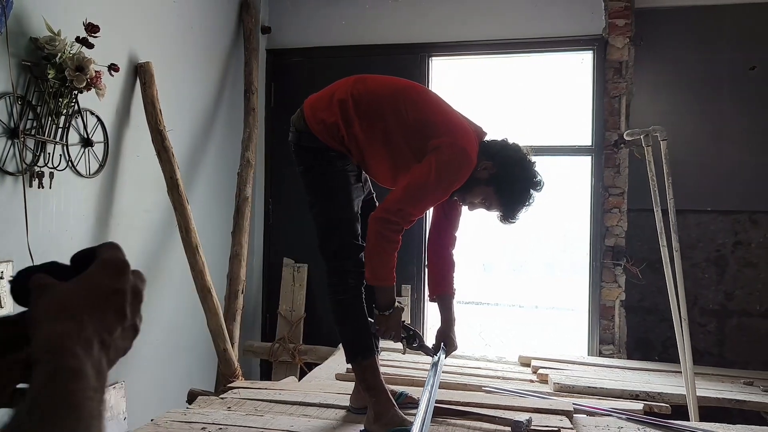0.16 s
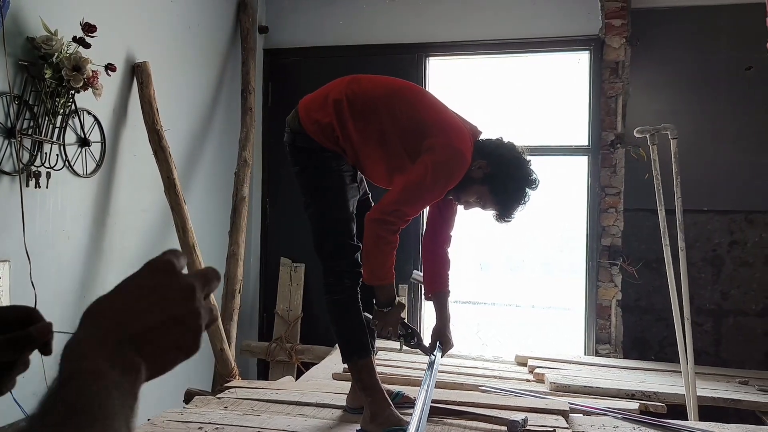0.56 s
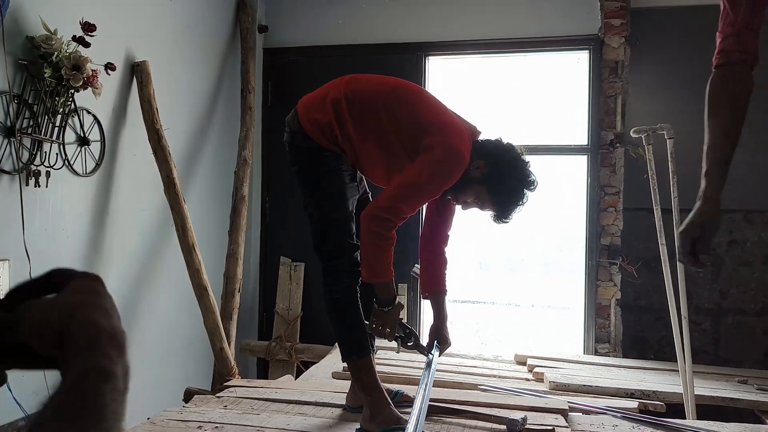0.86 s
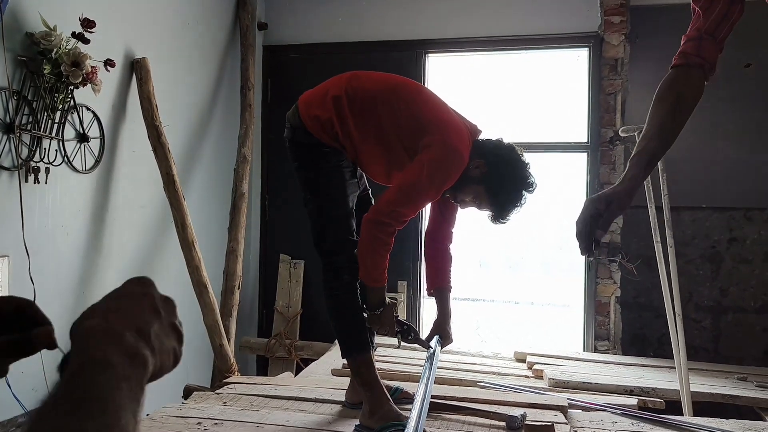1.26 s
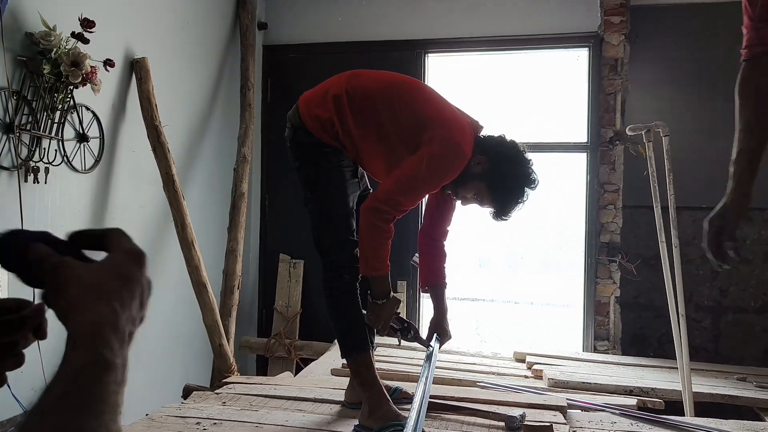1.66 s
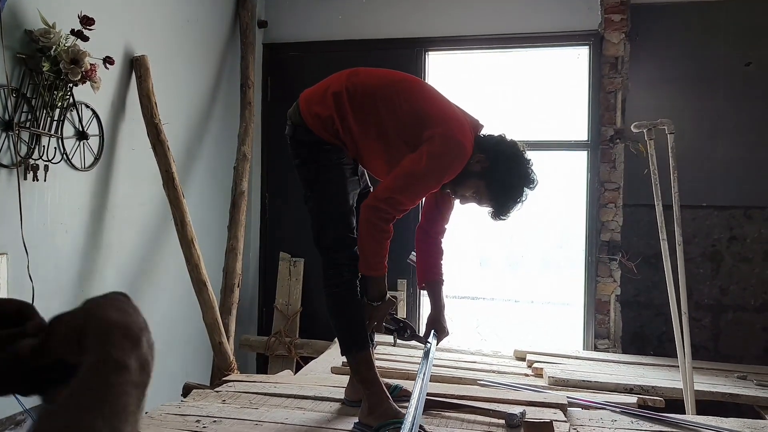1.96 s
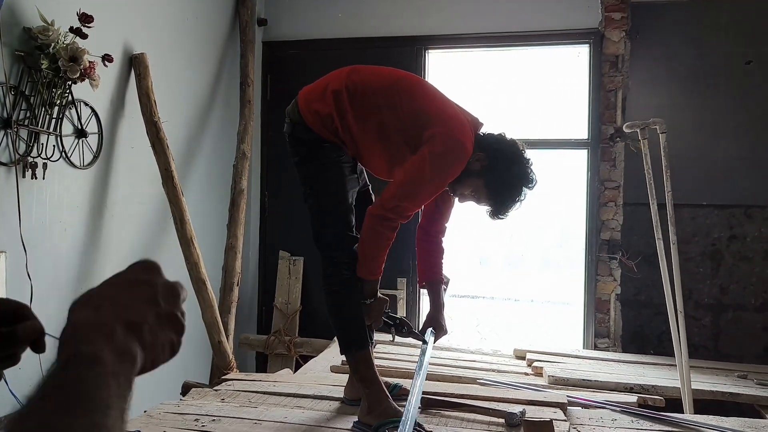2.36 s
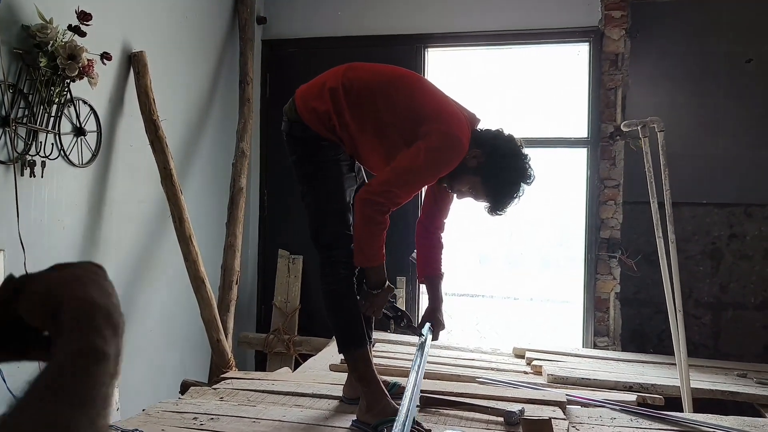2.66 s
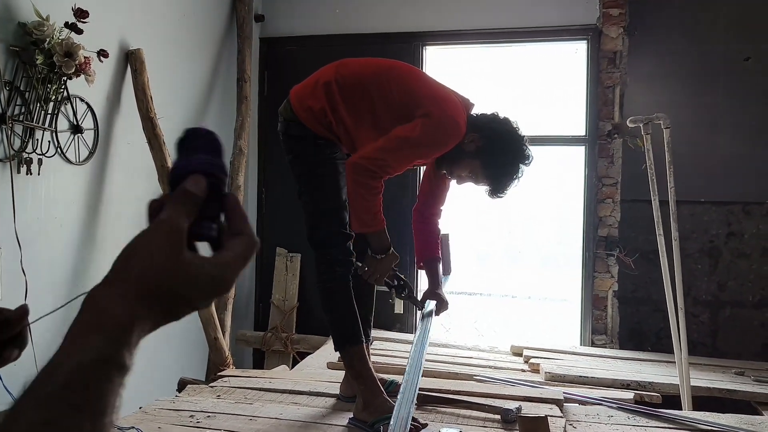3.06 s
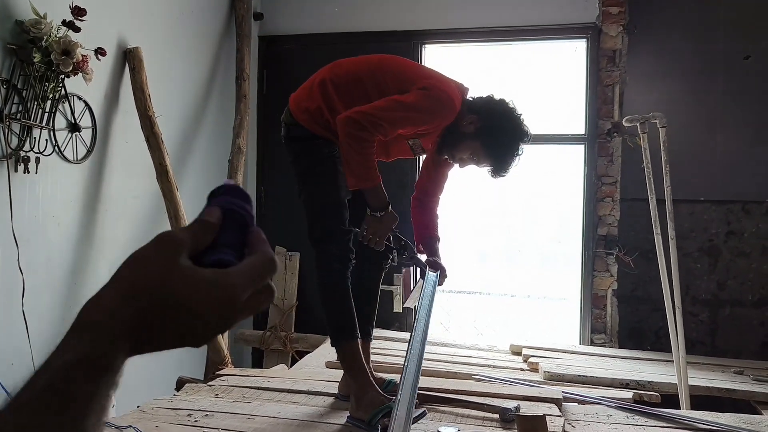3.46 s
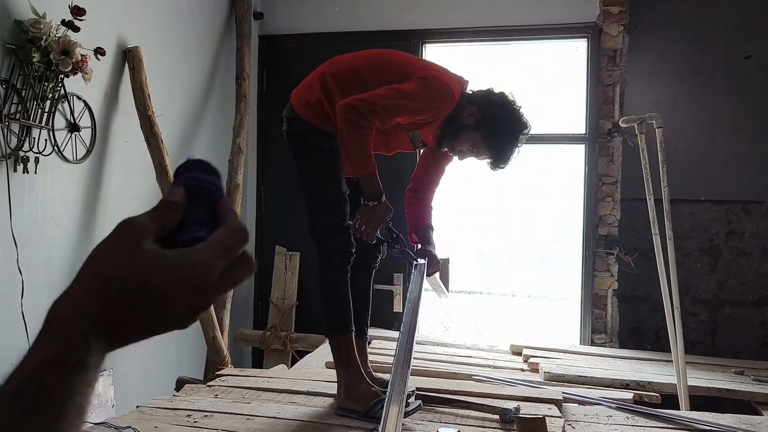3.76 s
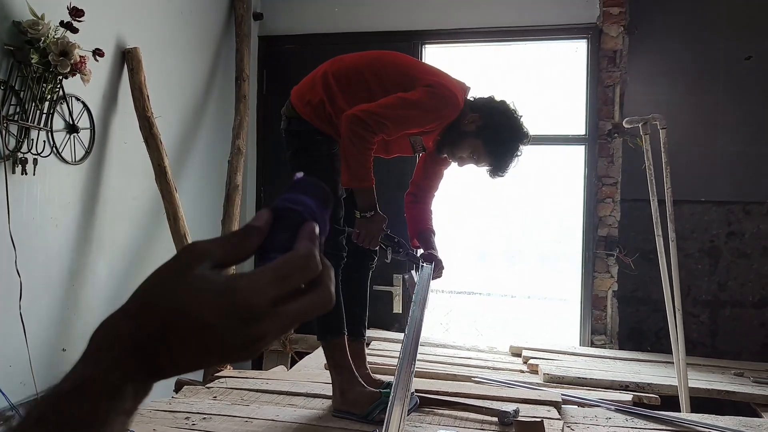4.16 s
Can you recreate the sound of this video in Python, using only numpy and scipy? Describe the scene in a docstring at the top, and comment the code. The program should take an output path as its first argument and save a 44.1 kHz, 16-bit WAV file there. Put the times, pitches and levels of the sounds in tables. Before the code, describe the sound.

A bare room with hard walls, heard through a phone a few metres from the work. Faint room and street noise hums underneath. For the first 1.6 seconds there is little: a tiny metal tick near the start, a light click at 0.7, fainter ones at 1.05 and 1.4. At about 1.6 the snips cut the thin steel channel: four hard, bright snaps crowd into a tenth of a second, with dense gritty shearing and a thin, tinny ring, then a smaller snap at 1.95. Near silence follows, with a slight plank knock at 2.25. At 2.45 a hollower metallic clack rings, a strong dull wooden knock lands at 2.57, and steel scrapes until about 3.0. Further clacks come near 3.05 and 3.35, a rattling scrape with plank rumble around 3.75, then it dwindles, with a faint knock at 4.1. Soft deep finger thumps touch the phone throughout.

```python
"""A bare room with a pile of planks: hand snips work on a thin steel channel a few metres from a phone.
Blows and dense shearing clicks drive modes and noise bursts of the channel's web, flanges, cut edge and burr.
The planks rumble as resonant noise and knock as soft decaying tones; fingers thump the phone in deep noise.
Coloured noise hums faintly, with one brief low tone. Steel and planks get the room's echo tail."""
import sys
import numpy as np
from scipy import signal
from scipy.fft import rfft, irfft
from scipy.io import wavfile

SR = 44100
rng = np.random.default_rng(int(sys.argv[2]) if len(sys.argv) > 2 else 0)


def waveform_to_disk(signal):
    """Save audio, clipped to [-1, 1], as 16-bit WAV at the path in sys.argv[1]."""
    frames = np.transpose(np.atleast_2d(signal))
    scaled = np.clip(frames, -1, 1) * 32767
    samples = np.round(scaled).astype(np.int16)
    wavfile.write(sys.argv[1], SR, samples)


def volts(x):
    """Linear amplitude factor 10**(x/20) for a level x in dB, scalar or array-like."""
    e = np.asarray(x, float) / 20
    return 10 ** e


N = 189364
T = np.arange(N) / SR

# noise of room and street, as a colour: (f/Hz, relative level/dB per Hz)
HUM_COLOUR = [(24, -44), (40, 20.5), (204, 9), (529, -40), (1090, 3), (1630, -14.5), (2840, -8.5),
              (7730, -14.5), (9690, -48.5), (12800, -18.5), (16000, -48.5)]
HUM_DB = -62
# faint low tone that swells and fades: (start t/s, end t/s, f/Hz, peak level/dB)
LOW_TONE = (.8, 1.08, 212, -58)

# fingers on the phone: (t/s, hold/s, level/dB)
FINGER_THUMPS = [(0.05, 0.13, -66), (1.42, 0.022, -64), (1.61, 0.036, -47), (1.7, .02, -46.5),
                 (2.1, 0.3, -68.5), (2.45, 0.052, -50.5), (2.62, 0.22, -58), (3.04, .03, -53.5),
                 (3.48, 0.089, -51.5), (3.72, 0.3, -53.5), (4.2, .06, -54)]
HAND_REST_DB = -75.5
PRESS_DB_PER_S, EASE_DB_PER_S = 253, 151.5  # how fast weight and fingers press and ease off

# resonances of long, middle and short planks: (f/Hz, width of each filter pass/Hz)
PLANK_RESONANCES = [(128, 55), (212, 60), (355, 150)]
# weight shifting on the pile: (t/s, hold/s, long planks level/dB, middle level/dB, short level/dB)
WEIGHT_SHIFTS = [(0.0, 0.11, -61.5, -66, -63), (1.412, 0.037, -59, -59, -53.5),
                 (1.672, 0.032, -63, -76, -54), (2.118, .04, -63, -58.5, -60.5),
                 (2.514, .04, -71, -61, -43.5), (2.594, 0.038, -45, -51, -41.5),
                 (2.682, .04, -43.5, -51, -47), (2.885, 0.087, -57, -65, -63.5),
                 (3.048, 0.056, -74, -66, -55), (3.363, 0.098, -59.5, -60.5, -49.5),
                 (3.506, 0.047, -64, -60, -50), (3.742, 0.11, -54, -44, -42),
                 (4.129, 0.097, -56.5, -58.5, -54)]
# rumble of the pile at rest: (long planks level/dB, middle level/dB, short level/dB)
PILE_REST = [-68, -69, -67.5]
# knocks on the planks: (t/s, level/dB, f/Hz, t60/s)
PLANK_KNOCKS = [(2.264, -29.5, 319, 0.023), (2.57, -12, 321, 0.025), (4.118, -36.5, 306, 0.058)]

# sharp blows on the steel: (t/s, flange level/dB, web level/dB re flange, edge level/dB re flange, contact/ms)
STEEL_BLOWS = [(0.0646, -34, -4.5, -10.5, 6.3), (0.711, -30.5, -2.5, -4.5, 1.4),
               (1.0614, -43.5, -13, -14, 6.2), (1.3812, -34, 6.5, -22.5, 6.8),
               (1.6135, -11, -27, 6.5, 1.57), (1.6705, -3.5, -37, -1, 1.4), (1.696, -8.5, -21.5, 4, 2.1),
               (1.7136, -3.5, -36, -11.5, 10), (1.9363, -14, -22, -3, 1.46), (2.4431, -9.5, -4, 3.5, 3.27),
               (2.946, -36.5, -1, -10, 5.1), (3.037, -22.5, -19, -19, 1.7), (3.3577, -15.5, -33, -12, 2.34)]
# blades shearing, steel sliding: (full bite t/s, hold/s, flange level/dB, web and edge level/dB re flange)
SHEAR_STROKES = [(0.0, 0.0042, -51, 2, -9), (.07, 0.0091, -47, -2.5, -1.5), (0.326, 0.04, -61, -2, -1.5),
                 (0.431, 0.027, -63.5, 2.5, -7), (0.679, .022, -58.5, -1.5, -8),
                 (0.711, 0.006, -42, -3, -4), (0.916, 0.042, -74, 0, -1), (1.069, 0.0092, -57, -1, -14),
                 (1.142, 0.027, -62.5, -0.5, -10), (1.351, .018, -55, -1, -13),
                 (1.383, 0.03, -40.5, 11, -25), (1.568, 0.036, -56.5, 6.5, 2),
                 (1.615, 0.0043, -26.5, -9.5, 8), (1.665, 0.073, -20, -15, -4.5),
                 (1.801, 0.044, -29.5, -16, -1), (1.906, .03, -39.5, -23, 5),
                 (1.929, 0.049, -30.5, -18, -5), (2.195, 0.048, -68.5, -0.5, 2),
                 (2.285, .08, -64.5, 2.5, 0), (2.445, .012, -24, -4.5, 0.5), (2.496, 0.1, -38.5, 5, -5.5),
                 (2.67, 0.17, -33.5, -3.5, -4.5), (2.809, 0.028, -36, -3.5, -4.5),
                 (2.937, 0.05, -38.5, 0.5, -8), (3.019, 0.053, -43.5, -1.5, -3),
                 (3.107, 0.023, -56.5, 12.5, -21), (3.205, .06, -55, 4.5, 1.5), (3.283, 0.071, -43, -1, -4),
                 (3.363, 0.029, -34, 2.5, -7), (3.389, 0.024, -38, -0.5, -20),
                 (3.531, 0.093, -67, 2.5, -13), (3.714, .012, -44.5, 3, -5),
                 (3.734, 0.077, -30, -1.5, -7.5), (3.841, .11, -41, 0.5, -4),
                 (3.984, 0.048, -63.5, 10, -10.5), (4.136, 0.084, -59.5, 6, 2)]
# modes that stand out, a list for main ring, web, flanges, edge, burr: (f/Hz, relative level/dB, t60/s)
STEEL_MODES = [
    [(947, -7, .3), (1040, -7, .2), (1066, 0, .35), (1090, -1, .3), (1120, -4, .25), (1150, -6, .2)],
    [(700, -4, .3), (770, -4, .25), (1235, -2, .25), (1345, -1, .25), (1700, -3, .4), (2170, -6, .3)],
    [(2580, -4, .25), (2665, 0, .25), (2745, -3, .25), (2920, -1, .25), (3150, -2, .25), (3330, -3, .25),
     (3470, -3, .2)],
    [(4570, 0, .2), (5050, -2, .2), (5410, -4, .2), (7850, -3, .15)],
    [],
]
# crowd of small plate modes in main ring and web, as a colour: (f/Hz, relative level/dB per Hz)
WEB_COLOUR = [(240, -46), (420, -11.5), (620, -7), (800, -4), (1000, -4), (1400, -4.5), (1900, -8.5),
              (2400, -10), (3100, -21)]
# the same for the flanges: (f/Hz, relative level/dB per Hz)
FLANGE_COLOUR = [(1240, -58.5), (2100, -25), (2430, -9.5), (2600, 1), (3010, 1.5), (3460, -1.5),
                 (3990, -17.5), (4600, -27), (5980, 1), (10100, -120)]
# the same for the cut edge: (f/Hz, relative level/dB per Hz)
EDGE_COLOUR = [(2530, 10), (4300, 2), (4610, 2), (5900, -3), (7950, -0.5), (9600, -16), (12500, -61),
               (21100, -120)]
# the same for the burr: (f/Hz, relative level/dB per Hz)
BURR_COLOUR = [(5530, -30.5), (9400, -17.5), (9840, -6), (10700, 1), (14900, 3), (16200, -1.5)]
# per part: (lowest f/Hz, highest f/Hz, crowd t60/s, crowd level/dB re single modes, left re right level/dB)
STEEL_PARTS = [(930, 1400, .15, -9.5, 4), (405, 2360, 0.062, 8.5, 2), (2430, 4400, 0.17, 11, -1),
               (4340, 9500, 0.27, 17, 2), (9280, 17000, 0.15, 30, -0.5)]
# how fast a stroke dies: main ring, web, flanges, edge, burr (each fall/dB per s)
LET_GO = [170, 190, 230, 243.6, 300]
# faint rubbing that never stops: main ring, web, flanges, edge, burr (each level/dB)
CREEP = [-71.5, -66, -71.5, -79.5, -91.5]
# the jaws hold the web: (from t/s, to t/s); its start is also the first cut
CLAMPED = (1.6, 2.15)
CHOKE_DB = -26.5  # main ring while clamped
UNCUT_DB = -5.5  # burr before the first cut
MAIN_DB, STROKE_BURR_DB, BLOW_BURR_DB = 2, -6, -6  # main ring re web; burr re edge
BITE_DB_PER_S, SAG_DB_PER_S = 2202, 28.5  # a stroke bites, then sags while it holds
CLICKS_PER_S, CLICK_SPREAD_DB = 6000, 1.5
CHATTER_PER_S, CHATTER_DB = 50, 1.8  # uneven bursts of clicks
REDRAW_SAMPLES = 4096  # the ring responses are redrawn at random this often
MODE_SPREAD_DB = 2  # random spread of the single modes' levels
CRACK_T60_S, CRACK_DB = 0.038, -2  # level re the crowd
PORT_LAG_S = 0.00027

ROOM_T60_S, ROOM_DB = 0.22, -5.5
TOP_HZ = 15800


def unit(x):
    """Scale to rms 1."""
    return x / np.sqrt(np.mean(x ** 2))


def colour(x, points):
    """Shape the spectrum along (f/Hz, level/dB) points, straight lines over log frequency."""
    hz, db = np.transpose(points)
    f = np.maximum(np.fft.rfftfreq(x.shape[-1], 1 / SR), 1)
    curve_db = np.interp(np.log(f), np.log(np.maximum(hz, 1)), db)
    return irfft(rfft(x) * volts(curve_db), x.shape[-1])


def fade(t60, size):
    """Exponential fall of 60 dB in t60 seconds."""
    return np.exp(-np.log(1000) * np.arange(size) / SR / t60)


def sides(db):
    """Left and right gains for a level difference."""
    return volts(np.array([db, -db]) / 2)


def swell(at, hold, db, rise, sag, fall):
    """Power of an event that rises to its level, sags while it holds and falls away; slopes in dB per s."""
    t = T - at
    before, during, after = np.maximum(-t, 0), np.clip(t, 0, hold), np.maximum(t - hold, 0)
    return volts(2 * (db - rise * before - sag * during - fall * after))


def pressing(rows, rest_db):
    """Gain over time of a resting level and the presses on top of it, one line per level column."""
    power = volts(2 * np.reshape(rest_db, (-1, 1)))
    for at, hold, *db in rows:
        power = power + swell(at, hold, np.reshape(db, (-1, 1)), PRESS_DB_PER_S, 0, EASE_DB_PER_S)
    return np.sqrt(power)


def hum():
    """Faint steady noise of room and street, and one brief low tone."""
    noise = rng.standard_normal(N) + 1.9 * rng.standard_normal((2, N))  # shared + own to each side
    steady = unit(colour(noise, HUM_COLOUR)) * volts(HUM_DB)
    start, end, hz, db = LOW_TONE
    arch = np.sin(np.pi * np.clip((T - start) / (end - start), 0, 1))
    return steady + volts(db) * arch * np.sin(2 * np.pi * hz * T)


def hand():
    """Fingers thump the phone's case: deep noise that swells with each press, stronger at the left port."""
    noise = rng.standard_normal(N) + 0.19 * rng.standard_normal((2, N))
    deep = signal.sosfilt(signal.butter(2, [18, 50], "band", fs=SR, output="sos"), noise)
    return unit(deep) * pressing(FINGER_THUMPS, HAND_REST_DB) * sides(2.5)[:, None]


def planks():
    """The pile rumbles at its resonances under shifting weight and takes a few dull knocks."""
    out = 0
    for (hz, width), gain in zip(PLANK_RESONANCES, pressing(WEIGHT_SHIFTS, PILE_REST)):
        noise = rng.standard_normal(N) + 0.38 * rng.standard_normal((2, N))
        peak = signal.iirpeak(hz, hz / width, SR)
        rumble = signal.lfilter(*peak, signal.lfilter(*peak, noise))
        out = out + unit(rumble) * gain
    for at, db, hz, t60 in PLANK_KNOCKS:
        i, t = int(at * SR), T[:4096]
        # wood gives way softly: the knock builds over a cycle
        soft = (1 - np.exp(-t * hz)) * fade(t60, 4096)
        tone = np.sin(2 * np.pi * hz * t) + .5 * np.sin(2 * np.pi * 1.65 * hz * t)
        out[:, i:i + 4096] += volts(db) * tone * soft
    return out


def parts(at, web_db, edge_db, burr_db):
    """Share of a contact for main ring, web, flanges, edge and burr, in dB."""
    clamp_start, clamp_end = CLAMPED
    choke = CHOKE_DB if clamp_start < at < clamp_end else 0
    uncut = UNCUT_DB if at < clamp_start else 0
    return np.array([web_db + MAIN_DB + choke, web_db, 0, edge_db, edge_db + burr_db + uncut])[:, None]


def ring(modes, points, lo, hi, t60, crowd_db, pan_db):
    """Random two-port response of one part: single modes, a crowd of small ones and a crack."""
    t = T[:16384]
    phase = rng.uniform(0, 2 * np.pi, (len(modes), 2, 1))
    spread = rng.standard_normal(len(modes))
    single = np.zeros((2, len(t)))
    for (hz, db, long), p, s in zip(modes, phase, spread):
        decay = fade(long, len(t)) / np.sqrt(long)  # long and short rings get like energy
        single += volts(db + MODE_SPREAD_DB * s) * np.sin(2 * np.pi * hz * t + p) * decay
    shared, own = rng.standard_normal(len(t)), rng.standard_normal((2, len(t)))
    # the far port gets the shared sound a little later
    late = np.array([shared, np.roll(shared, round(PORT_LAG_S * SR))])
    dense = colour(late + 2.8 * own, points)
    crack = volts(CRACK_DB) * unit(dense * fade(CRACK_T60_S, len(t)))
    crowd = unit(dense * fade(t60, len(t))) + crack
    both = single / (np.std(single) + 1e-9) + volts(crowd_db) * crowd
    # each part radiates only its own range
    both = signal.sosfilt(signal.butter(4, [.9 * lo, 1.1 * hi], "band", fs=SR, output="sos"), both)
    unit_energy = both / np.sqrt(np.sum(both ** 2) / 2)
    return unit_energy * sides(pan_db)[:, None]


def shearing():
    """The blades bite and slip: random clicks in uneven bursts, a line of drive for each part."""
    struck = rng.random(N) < CLICKS_PER_S / SR
    clicks = struck * volts(CLICK_SPREAD_DB * rng.exponential(1, N)) * rng.standard_normal(N)
    hold = SR // CHATTER_PER_S
    knots = N // hold + 2
    chatter = np.interp(np.arange(N) / hold, np.arange(knots), rng.standard_normal(knots))
    clicks = unit(clicks * volts(CHATTER_DB * chatter))
    power = volts(2 * np.array(CREEP))[:, None]
    fall = np.array(LET_GO)[:, None]
    for at, long, db, web_db, edge_db in SHEAR_STROKES:
        level_db = db + parts(at, web_db, edge_db, STROKE_BURR_DB)
        power = power + swell(at, long, level_db, BITE_DB_PER_S, SAG_DB_PER_S, fall)
    return np.sqrt(power) * clicks


def add_blows(drive):
    """Each blow is a hard first tick followed by a few ms of fading chatter, added to the drive."""
    chatter = rng.standard_normal((len(STEEL_BLOWS), 2048))
    for (at, db, web_db, edge_db, ms), noise in zip(STEEL_BLOWS, chatter):
        i = int(at * SR)
        push = np.r_[3.0, noise[1:]] * np.exp(-np.arange(2048) / (SR * ms / 1000))
        drive[:, i:i + 2048] += volts(db + parts(at, web_db, edge_db, BLOW_BURR_DB)) * push


def steel():
    """Shear clicks and blows ring each part of the channel; redrawn responses vary the ringing colour."""
    drive = shearing()
    add_blows(drive)
    colours = (WEB_COLOUR, WEB_COLOUR, FLANGE_COLOUR, EDGE_COLOUR, BURR_COLOUR)
    out = np.zeros((2, N + 16384))
    cuts = list(range(0, N, REDRAW_SAMPLES)) + [N]
    for a, b in zip(cuts, cuts[1:]):
        for d, modes, points, part in zip(drive, STEEL_MODES, colours, STEEL_PARTS):
            response = ring(modes, points, *part)
            out[:, a:b + 16383] += signal.fftconvolve(d[None, a:b], response, axes=1)
    return out[:, :N]


def room(x):
    """Bare walls: a dense echo tail that fades in over 2.4 ms, thin in the bass and a touch dull on top."""
    size = SR // 2
    tail = colour(rng.standard_normal((2, size)), [(150, -17.5), (700, -1.5), (5000, -3), (16000, -3)])
    tail = tail * fade(ROOM_T60_S, size) * np.clip(T[:size] / 0.0024, 0, 1)
    tail = tail / np.sqrt(np.sum(tail ** 2) / 2)
    return x + volts(ROOM_DB) * signal.fftconvolve(x, tail, axes=1)[:, :N]


def scene():
    """Steel and planks sound in the room; hand and hum reach the phone as they are."""
    return room(steel() + planks()) + hand() + hum()


def roll_off(x):
    """The treble ends steeply here."""
    return signal.sosfilt(signal.butter(12, 16660, fs=SR, output="sos"), x)


def record(dry):
    """The phone rounds the loudest peaks and cuts the top."""
    rounded = np.tanh(dry)
    finished = signal.sosfilt(signal.ellip(8, .2, 60, TOP_HZ, fs=SR, output="sos"), rounded)
    return roll_off(finished)


dry = scene()
out = record(dry)
waveform_to_disk(out)
```